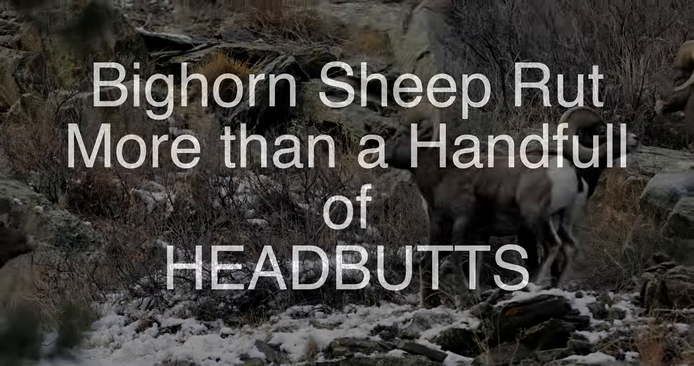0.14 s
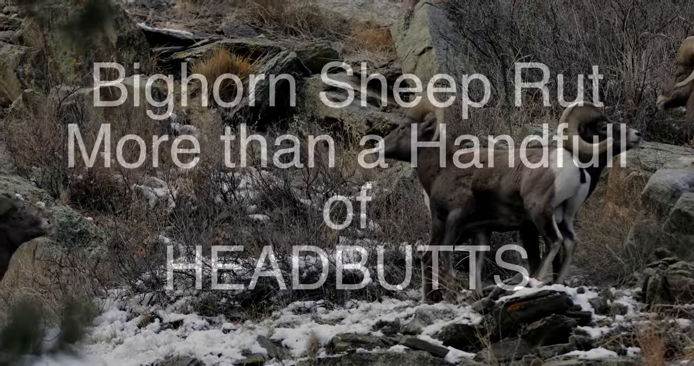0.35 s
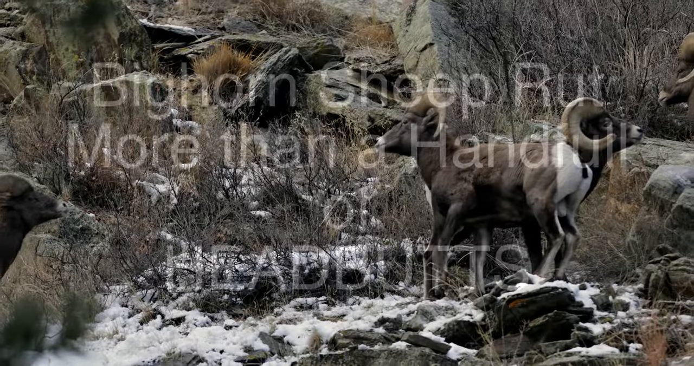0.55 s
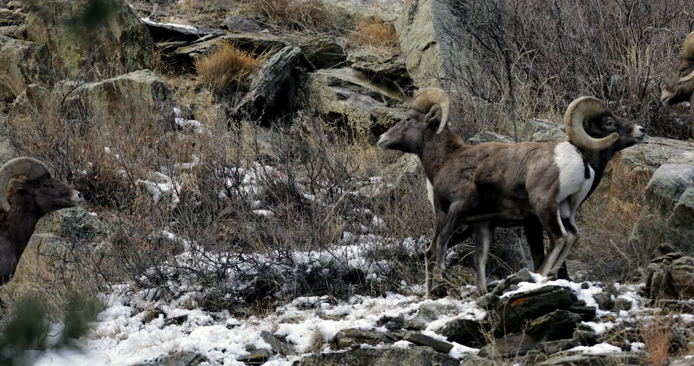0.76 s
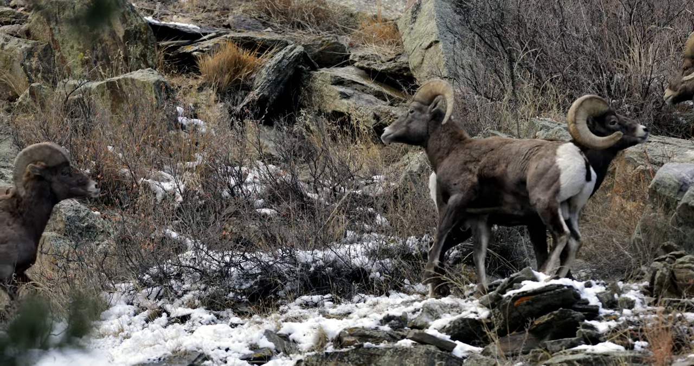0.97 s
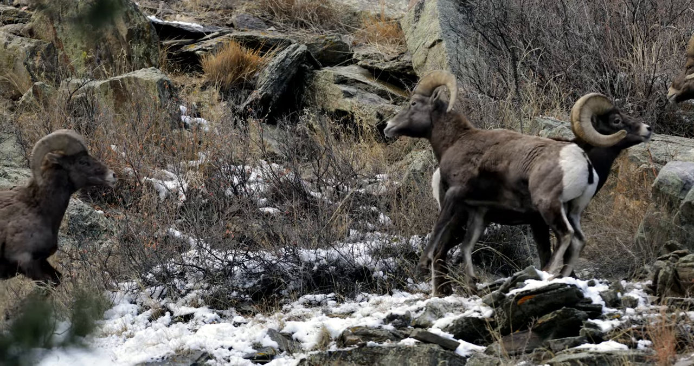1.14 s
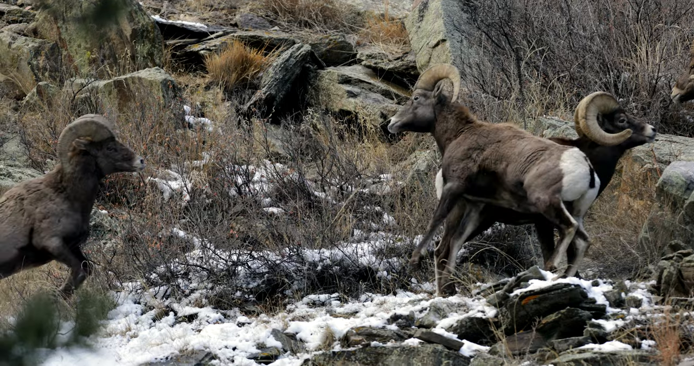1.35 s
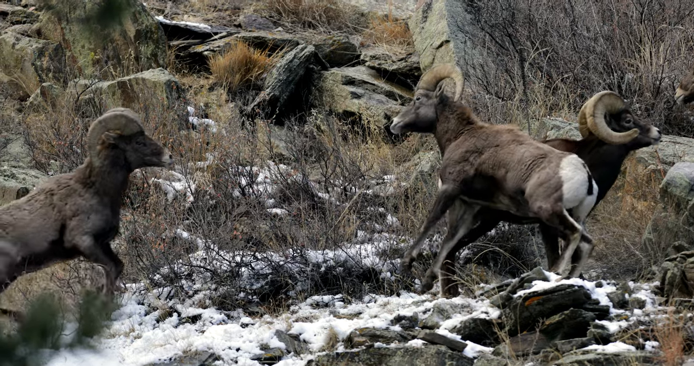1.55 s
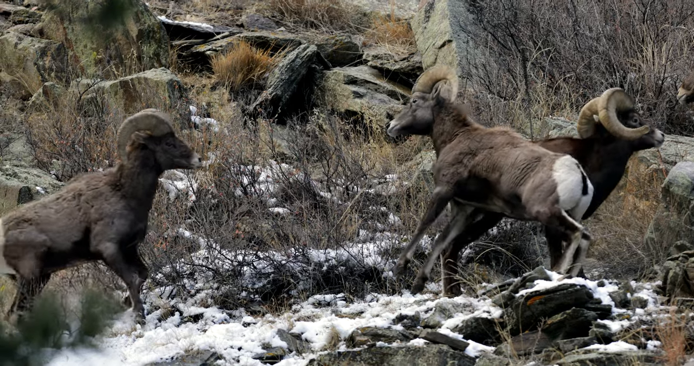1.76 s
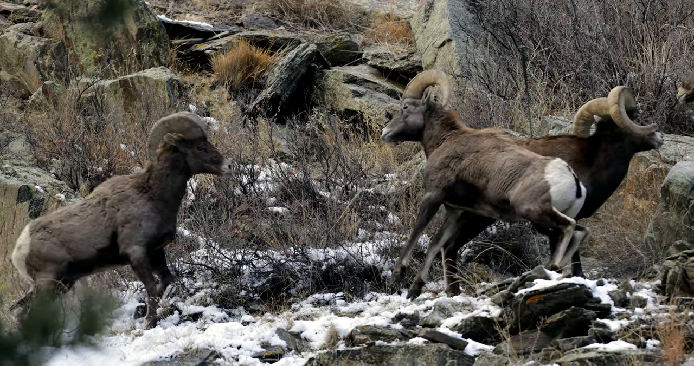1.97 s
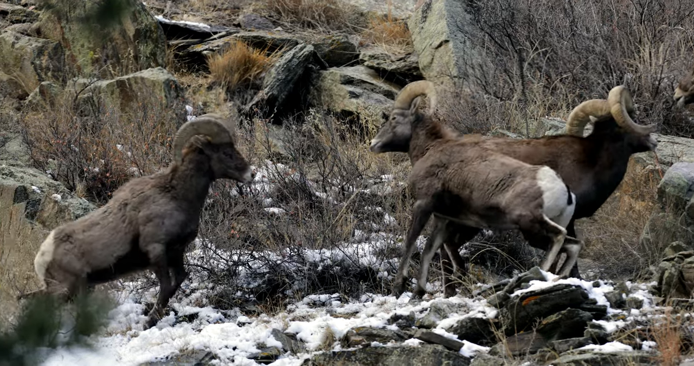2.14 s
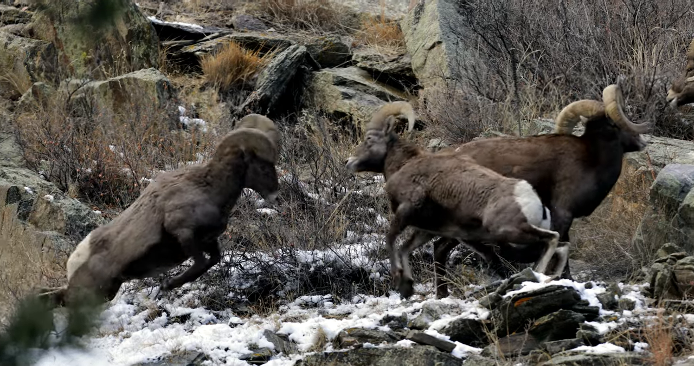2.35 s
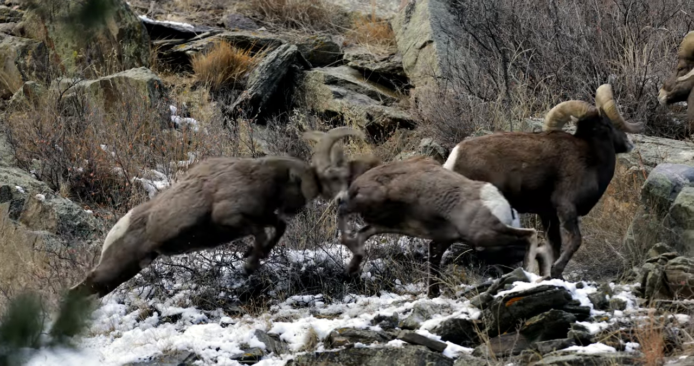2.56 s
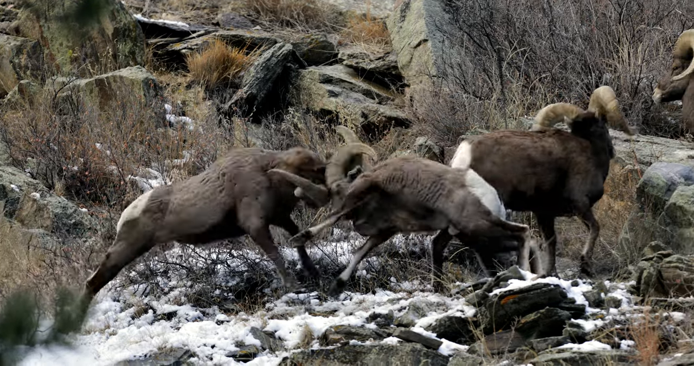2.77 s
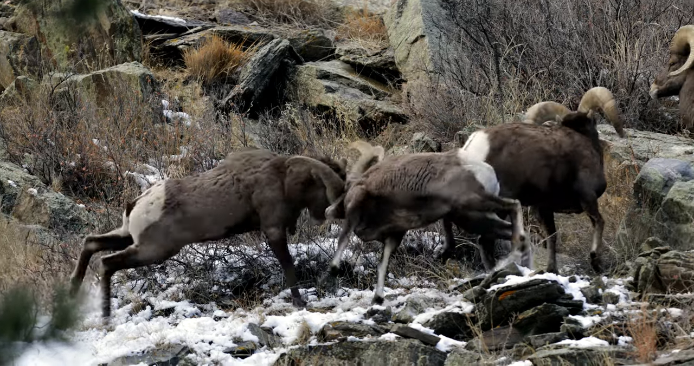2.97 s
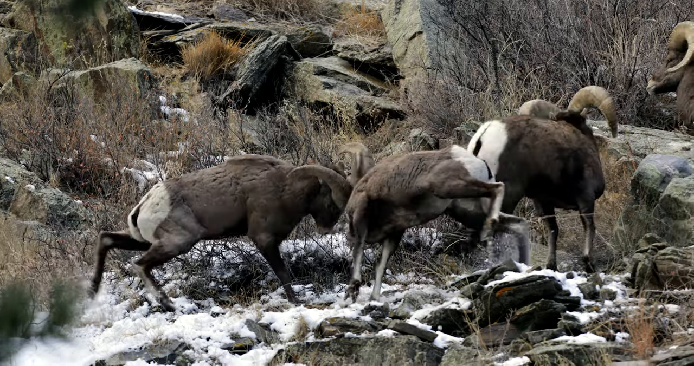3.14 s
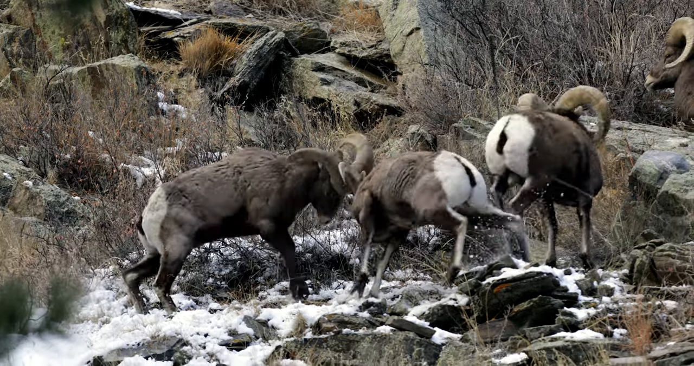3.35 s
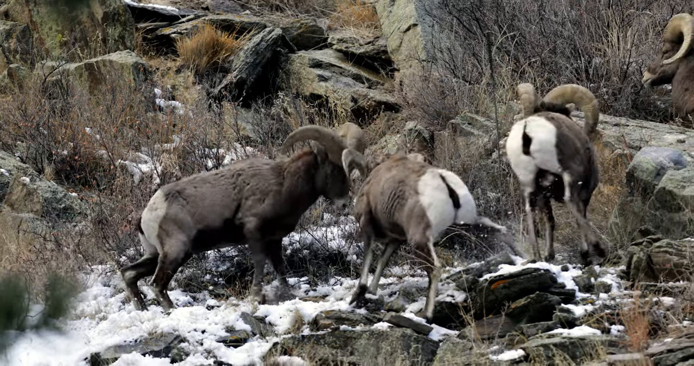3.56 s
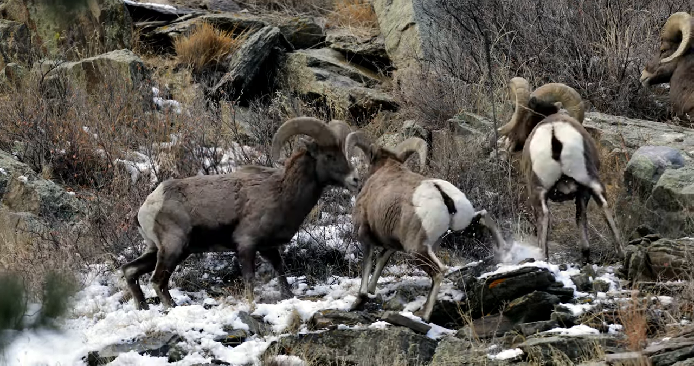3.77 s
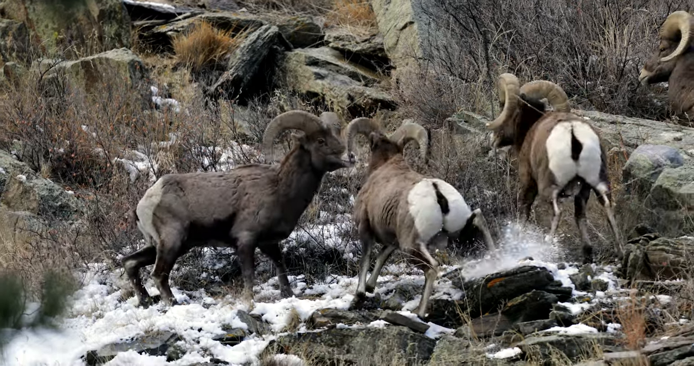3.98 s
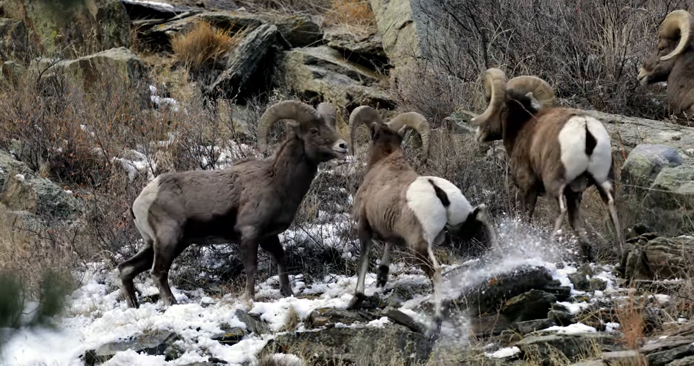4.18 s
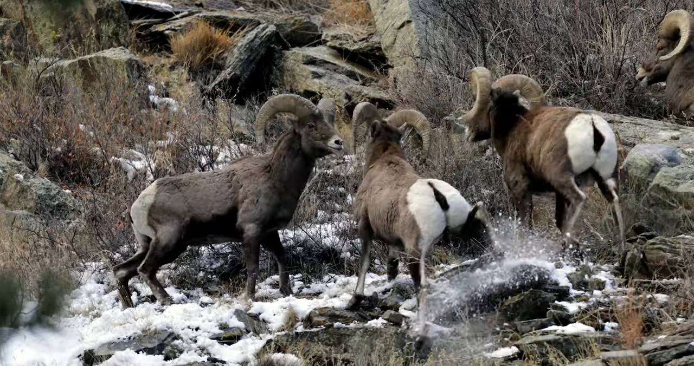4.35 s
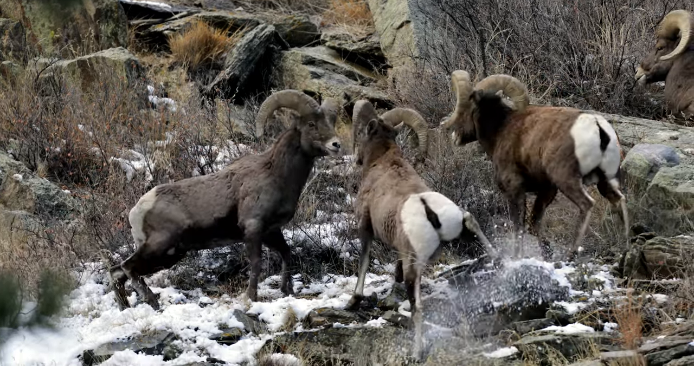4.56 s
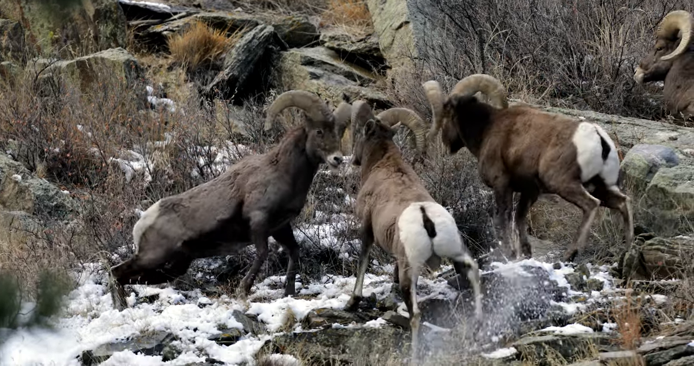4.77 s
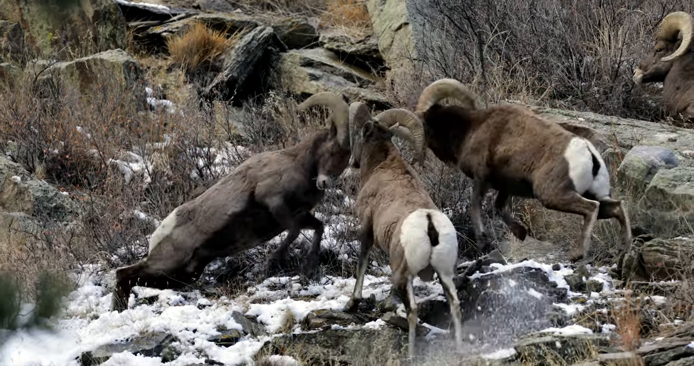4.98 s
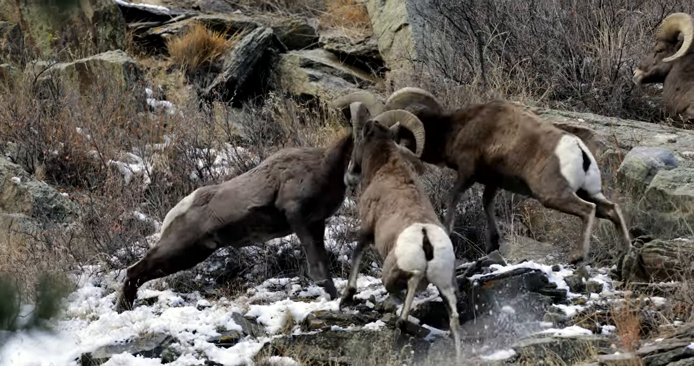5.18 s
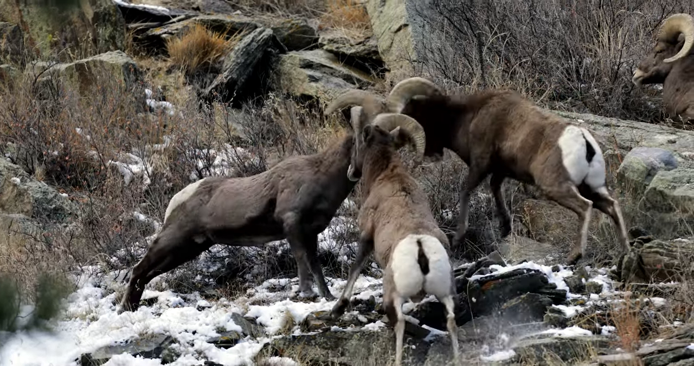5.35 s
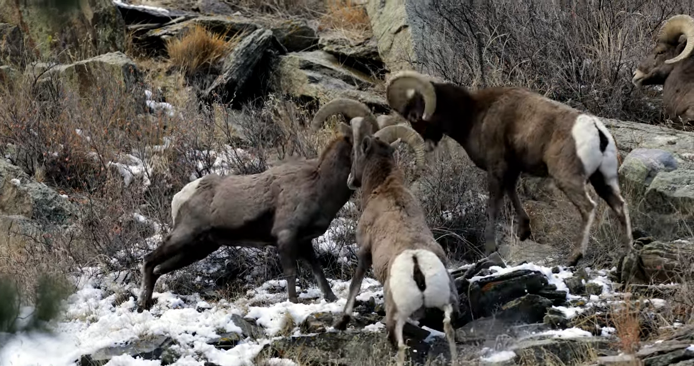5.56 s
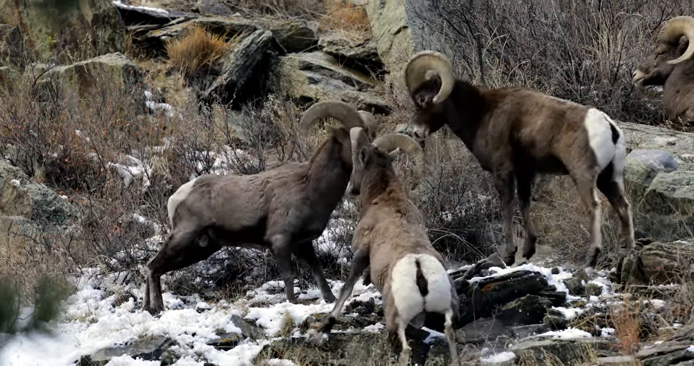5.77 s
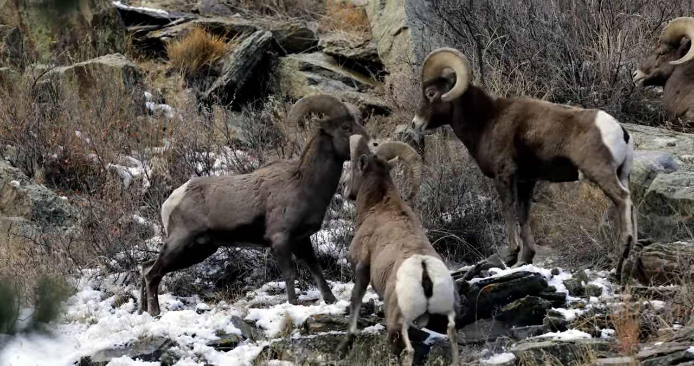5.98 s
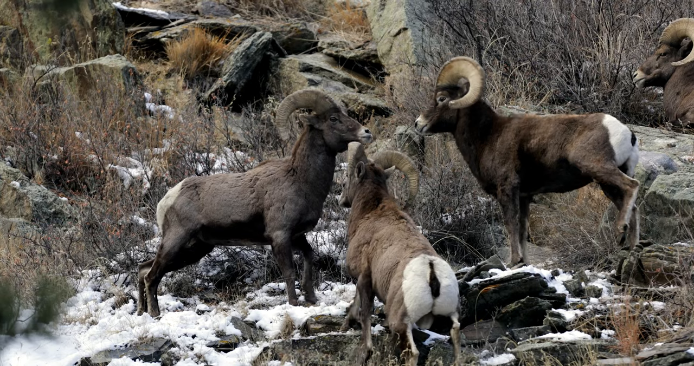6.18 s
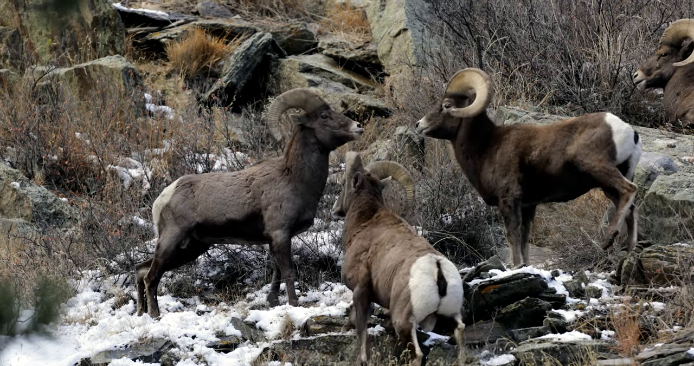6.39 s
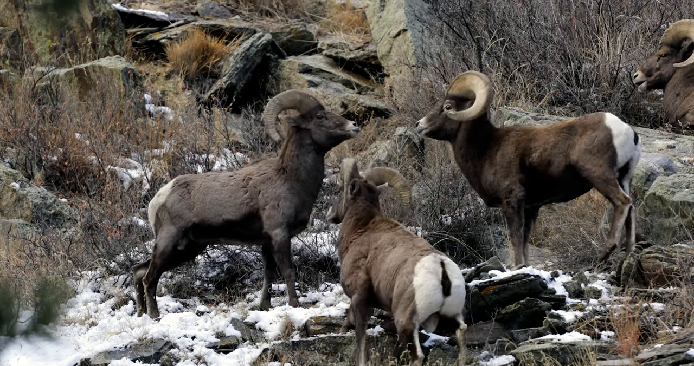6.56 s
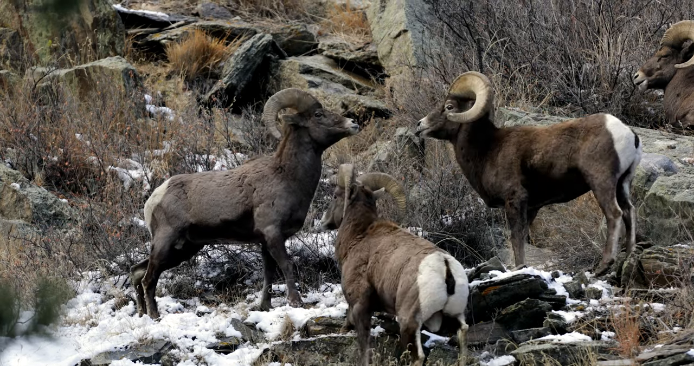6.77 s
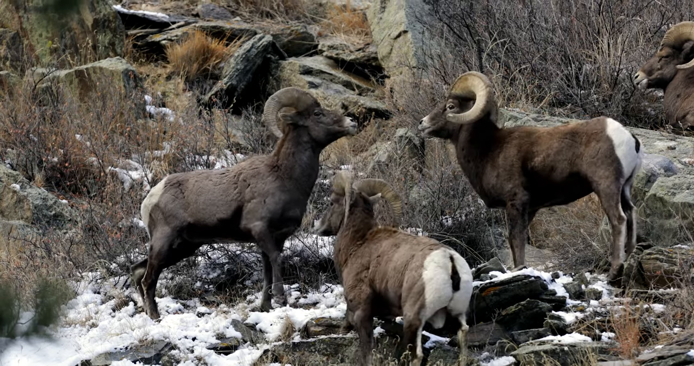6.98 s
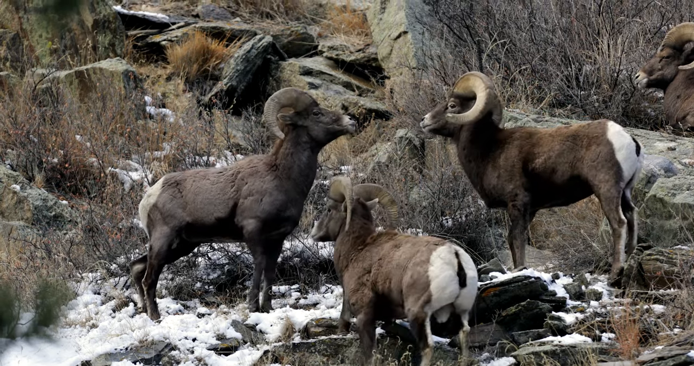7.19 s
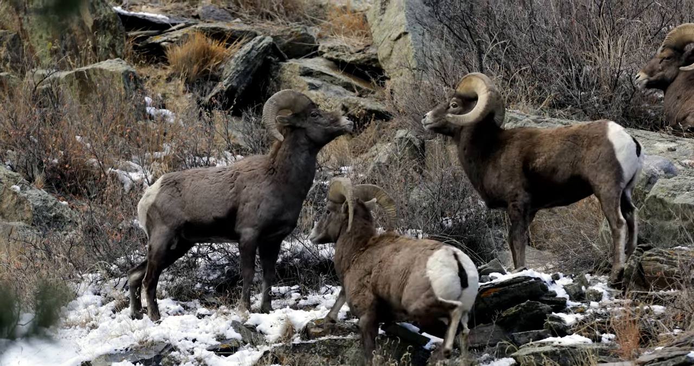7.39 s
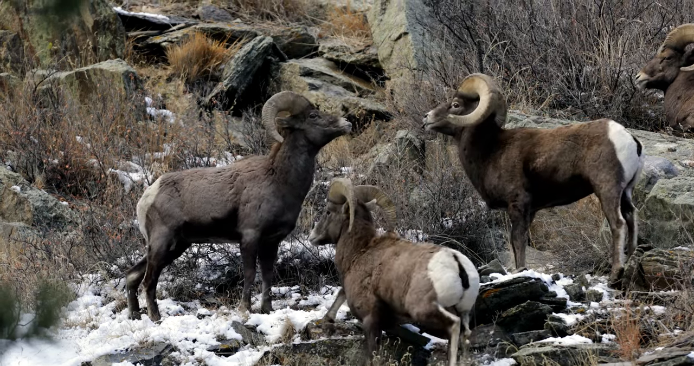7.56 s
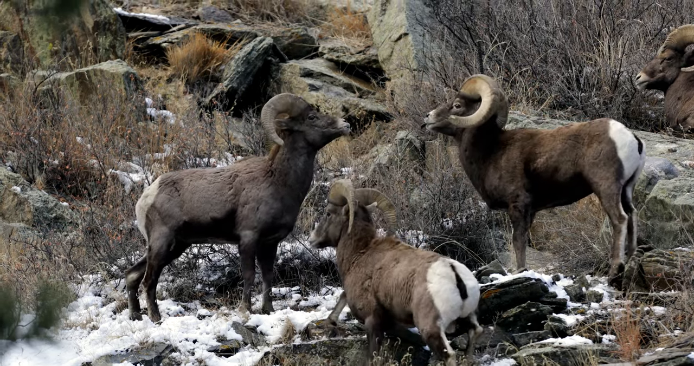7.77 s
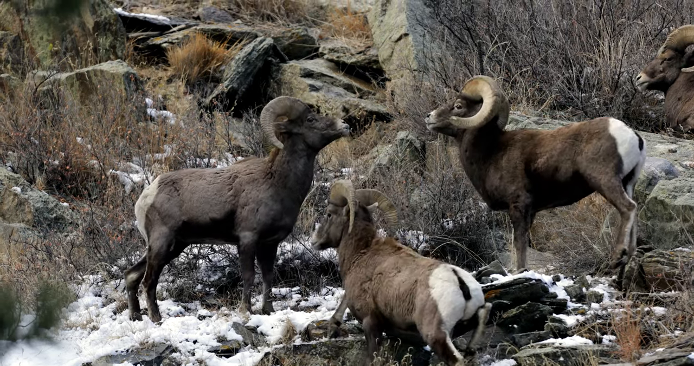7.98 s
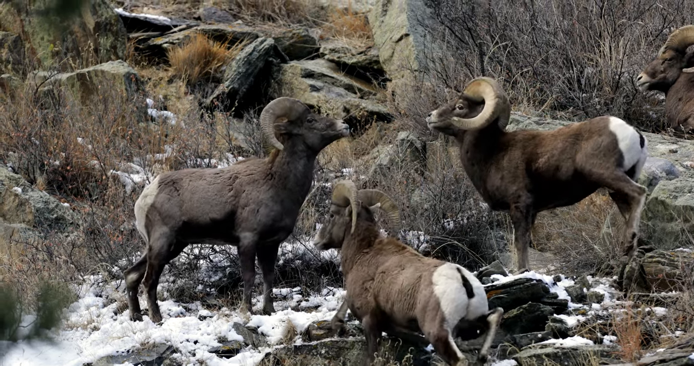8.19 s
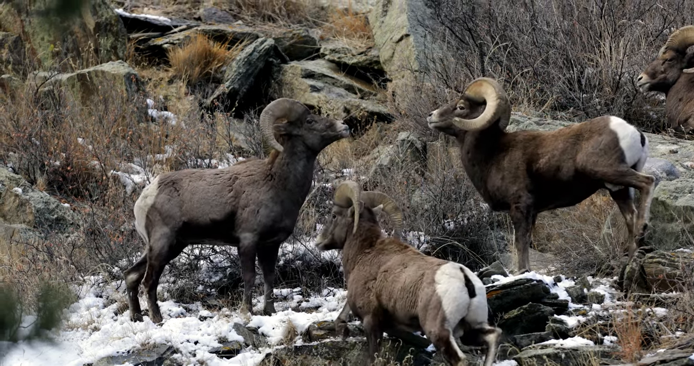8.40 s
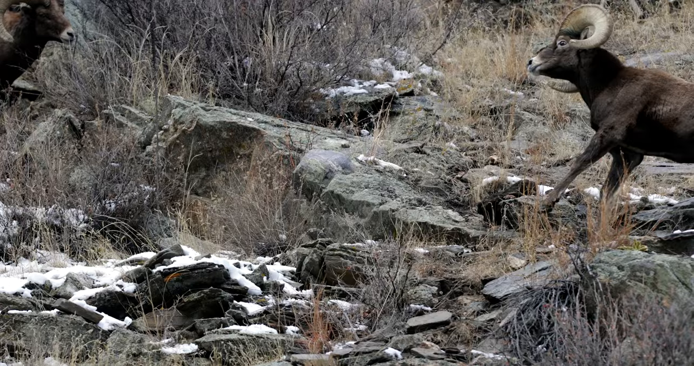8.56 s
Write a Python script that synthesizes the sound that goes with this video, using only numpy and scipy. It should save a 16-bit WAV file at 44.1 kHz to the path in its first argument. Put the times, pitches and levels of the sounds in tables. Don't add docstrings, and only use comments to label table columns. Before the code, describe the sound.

The sound begins almost silent and fades in over about two seconds, revealing a smooth, steady stream rush with fine bubbling, hissing spray and occasional rounded plops. Soft low wind gusts and a faint hum sit beneath it. At about 2.6 s two rams' horns collide: a very loud, sharp crack with a short woody skull knock, a bass thump that overloads, quick bright slaps from nearby rock and a tail dying within about a third of a second. The stream carries on with small splashes and hoof-like ticks and a gust near 3.6 s. A low swell leads into the second clash at about 5.2 s, drier and much heavier, its boom wobbling and distorting, with a slightly later echo off the slope. Another gust follows. Around 6.5 s the low rumble drops away, leaving clear rushing water, plops and ticks until 8.6 s, the rumble returning just at the end.

```python
import sys
import numpy as np
from scipy import signal
from scipy.fft import rfft, irfft, next_fast_len
from scipy.io import wavfile
from scipy.ndimage import uniform_filter1d, map_coordinates

SR = 44100
rng = np.random.default_rng(int(sys.argv[2]) if len(sys.argv) > 2 else 0)


def unload_audio(sound):
    columns = np.transpose(np.atleast_2d(sound))
    steps = np.round(np.clip(columns, -1, 1) * 32767)
    wavfile.write(sys.argv[1], SR, steps.astype(np.int16))


def gain_from_decibels(decibels):
    exponent = np.asarray(decibels, float) / 20
    return 10 ** exponent


N = 380583

# time_s, rush_db
STREAM_LEVEL = [(0, -80.5), (.17, -66.5), (.4, -58), (.53, -56), (.62, -50.5), (.87, -49), (1.38, -50.5),
                (1.7, -47.5), (2.15, -41.5), (2.74, -41), (3.4, -42), (3.85, -41), (5.08, -43.5),
                (5.34, -41.5), (5.8, -41.5), (7.3, -43), (8.63, -42)]
# freq_hz, level_db (per Hz)
RUSH_COLOUR = [(53, -94), (90, -89.5), (151, -27.5), (260, -14.5), (353, -16), (706, -1.5), (821, -1),
               (1090, -5.5), (1570, -5), (3660, -17), (5070, -21), (8530, -25), (13500, -38), (15000, -49),
               (16000, -59.5)]
# freq_hz, level_db (per Hz)
SPRAY_COLOUR = [(2060, -48), (3500, 10), (5090, -14), (8690, 14), (13700, -18), (15100, -30), (16000, -45)]
# freq_hz, side_minus_mid_db
STREAM_WIDTH = [(60, -10), (110, -3), (200, -11.5), (380, -7), (700, -14.5), (1290, -40), (2380, -24),
                (4400, -45), (8120, -11), (15000, -10.5)]
# freq_hz, left_minus_right_db
STREAM_LEAN = [(60, 0.0), (110, 6), (200, -4), (380, -2), (700, -1), (1290, -1.5), (2380, 0.5), (4400, -1),
               (8120, -4), (15000, -1)]
# centre_s, swell_db, half_length_s
WIND_GUSTS = [
    (.37, 5, .1),
    (1.08, 9, .14),
    (1.55, 10, .25),
    (2.3, 5, .06),
    (2.95, 6, .25),
    (3.63, 13, .13),
    (5.46, 12, .14),
    (5.8, 7, .25),
]
# start_s, peak_db, pitch_hz
BIG_BUBBLES = [(0.248, -46.5, 644), (1.719, -43, 690), (1.985, -49, 697), (2.07, -43, 263),
               (2.079, -38, 912.4), (2.294, -28.5, 690), (2.43, -31, 566), (3.419, -32, 860),
               (3.439, -35, 486), (3.858, -31, 1220), (4.317, -27.5, 770), (5.999, -33, 853),
               (6.054, -26, 633), (6.624, -29.5, 630), (7.958, -28, 790), (8.17, -40, 850),
               (8.296, -33, 784)]
# start_s, peak_db, pitch_hz
SPLASH_TICKS = [(1.4726, -33.5, 2536), (1.915, -38, 5560), (2.2594, -33, 2600), (3.1894, -47, 2830),
                (4.2078, -35, 2750), (4.8303, -31, 2670), (5.4195, -42, 3030), (6.2244, -45, 2950),
                (6.35, -33, 2540), (6.4314, -30.5, 3450), (6.7436, -49, 2700), (8.3344, -36, 3860),
                (8.4442, -33, 2900)]
# end_s, strength (full scale x ms)
LEAD_SWELLS = [
    (2.6321, -6.8),
    (5.1859, 18.6),
]
# start_s, blow (full scale x ms), first_recoil (full scale x ms),
# recoil_wait_s, share_kept_each_swing
AIR_PUSHES = [
    (2.64, 22.6, -7.9, .003, .46),
    (5.1964, 180.4, 16.25, .01335, .4),
]
# start_s, peak_db, skull_hz, skull_t60_s, tail_wait_s
HORN_BLOWS = [
    (2.6394, 12, 720, .012, .003),
    (5.1973, 14, 560, .007, .019),
]
# start_s, peak_db, ring_hz, t60_s
ROCK_ECHOES = [
    (2.650, -15, 820, .03),
    (2.6585, -10, 2330, .022),
    (2.667, -16, 2200, .015),
    (5.2155, -19, 800, .02),
]
# freq_hz, level_db (per Hz)
TAIL_COLOURS = [
    [(120, -29), (200, -5), (509, -8.5), (612, -2), (709, -4), (806, 0), (1210, -22), (1370, -29),
     (1480, -8), (2330, -7.5), (3970, -20), (7270, -18), (16000, -31)],
    [(120, -46), (200, -0.5), (448, 0.5), (623, -13), (709, 3), (1140, -18.5), (1350, -8), (3490, -19),
     (3900, -25), (7270, -21), (16000, -33)],
]
# freq_hz, t60_s
TAIL_DECAY = [(200, 0.31), (700, 0.34), (1500, 0.27), (4000, 0.3), (10000, 0.22), (15000, 0.17)]
# tail level_db, stretch of its decay, time it takes to fill in_s
TAIL_LEVEL_DB = [-18, -20]
TAIL_STRETCH = [0.95, 1.16]
TAIL_FILL_S = [0.0022, 0.029]


def unit(x):
    return x / np.sqrt(np.mean(x ** 2) + 1e-20)


def along(points, hz):
    f, v = np.transpose(points)
    return np.interp(np.log(hz + 1), np.log(f + 1), v)


def wobble(rate):
    knots = rng.standard_normal(int(N * rate / SR) + 4)
    return map_coordinates(knots, [np.arange(N) * rate / SR])


def filtered(x, response):
    size = next_fast_len(N + SR)
    hz = np.fft.rfftfreq(size, 1 / SR)
    return irfft(rfft(x, size) * response(hz), size)[..., :N]


def patchy(mid_db, side_db):
    z = signal.stft(rng.standard_normal((2, N)), nperseg=512)[2]
    field = uniform_filter1d(rng.standard_normal(z.shape), size=9, axis=1)
    field = uniform_filter1d(field, size=8, axis=2)
    depth_db = np.reshape([mid_db, side_db], (2, 1, 1))
    return signal.istft(z * gain_from_decibels(depth_db * unit(field)), nperseg=512)[1][:, :N]


def bubbles(s, db, hz, t60, rise, size):
    t = np.arange(size) / SR
    hz, t60 = hz[:, None], t60[:, None]
    shape = gain_from_decibels(db[:, None] - 60 * t / t60) * (1 - np.exp(-t * hz))
    wave = shape * np.sin(2 * np.pi * hz * (t + rise * t * t / (2 * t60)))
    at = np.round(s * SR).astype(int)[:, None] + np.arange(size)
    return np.bincount(at.ravel(), wave.ravel(), N + size)[:N]


def placed(pair, spectrum):
    def colour(hz):
        return gain_from_decibels(along(spectrum, hz) + [0 * hz, along(STREAM_WIDTH, hz)])

    mid, side = filtered(pair, colour)
    both = np.array([mid + side, mid - side]) / np.std(mid)
    return filtered(both, lambda hz: gain_from_decibels(np.outer([.5, -.5], along(STREAM_LEAN, hz))))


def bubble_swarm():
    u = rng.random((4000, 4))
    hz = 250 * 24 ** u[:, 1]
    db = 2.5 * np.log2(hz) - 2.5 * np.log(u[:, 2] + .02)
    return bubbles(u[:, 0] * N / SR, db, hz, (10 + 20 * u[:, 3]) / hz, rise=.3, size=1600)


def droplet_spit():
    v = rng.random((1500, 3))
    hz = 3000 * 4 ** v[:, 1]
    db = -3 * np.log(v[:, 2] + .02)
    return bubbles(v[:, 0] * N / SR, db, hz, 5 / hz, rise=.1, size=120)


def stream():
    time_s, level_db = np.transpose(STREAM_LEVEL)
    rush_db = np.interp(np.arange(N) / SR, time_s, level_db)
    water = patchy(mid_db=.7, side_db=4)
    water[0] = unit(water[0]) + gain_from_decibels(-13) * unit(bubble_swarm())
    water[0] = water[0] + gain_from_decibels(-13) * unit(droplet_spit())
    water[1] = unit(water[1])
    swell_db = .25 * wobble(2.5) + .55 * wobble(14)
    spray_db = rush_db - 33.5 + 2.5 * wobble(3.64) + swell_db + 2.078 * wobble(21)
    spray = gain_from_decibels(spray_db) * placed(patchy(mid_db=-3.5, side_db=14.5), SPRAY_COLOUR)
    return gain_from_decibels(rush_db + swell_db) * placed(water, RUSH_COLOUR) + spray


def rumble():
    t = np.arange(N) / SR
    fade_db = -28 * np.exp(-t / .2)
    gusts_db = sum(db * np.exp(-((t - s) / half) ** 2) for s, db, half in WIND_GUSTS)
    wind_db = -78 + fade_db + gusts_db

    def wind_colour(hz):
        return (hz > 12) / (1 + (hz / 35) ** 2) / (1 + (hz / 110) ** 4)

    wind = unit(filtered(rng.standard_normal(N), wind_colour))
    hum_db = -82.5 + fade_db + 3.3 * wobble(7.9)
    hum_hz = 70 + .75 * t
    hum = np.sqrt(2) * np.sin(2 * np.pi * np.cumsum(hum_hz) / SR + 1.1 * wobble(7))
    lift_on = np.clip((6.51 - t) / 0.017, 0, 1) + np.clip((t - 8.54) / 0.071, 0, 1)
    return lift_on * (gain_from_decibels(wind_db) * wind + gain_from_decibels(hum_db) * hum)


def drops():
    s, db, hz = np.transpose(BIG_BUBBLES)
    plops = bubbles(s, db + 1.5, hz, 26.3 / hz, rise=.2, size=4000)
    s, db, hz = np.transpose(SPLASH_TICKS)
    ticks = bubbles(s, db - 0.5, hz, .008 + 0 * hz, rise=.4, size=1000)
    return filtered(plops + ticks, lambda hz: 1 / (1 + (170 / (hz + 1)) ** 8))


def squashed(x, top, knee):
    return x / (1 + np.abs(x / top) ** knee) ** (1 / knee)


def thump():
    pushes, swell_ends, turn = np.zeros(N), np.zeros(N), np.arange(8)
    swing_s, slows = .011, 1.12
    swings_s = swing_s * (slows ** turn - 1) / (slows - 1)
    for s, blow, recoil, wait, keeps in AIR_PUSHES:
        at = s + np.r_[0, wait + swings_s]
        pushes[np.round(at * SR).astype(int)] = np.r_[blow, recoil * (-keeps) ** turn]
    for end, strength in LEAD_SWELLS:
        swell_ends[round(end * SR)] = strength
    swelling = filtered(swell_ends, lambda hz: 1 / (1 - 1j * hz / 19.2))
    air = (pushes + swelling) * SR / 1000

    def cut_and_lift(hz):
        cut = (1j * hz / (4.22 + 1j * hz)) ** 3 * (1j * hz / (9.48 + 1j * hz)) ** 2
        lift = np.exp(-(hz / 83.4) ** 2.2) * (1 - .69 * np.exp(-(hz / 26) ** 2))
        return cut * lift

    return squashed(filtered(air, cut_and_lift), top=.7, knee=6)


def slope_tail(t, colour, stretch):
    f, at, z = signal.stft(rng.standard_normal(len(t)), SR, nperseg=256)
    decay_db = 60 * at / stretch / along(TAIL_DECAY, f)[:, None]
    z = z * gain_from_decibels(along(colour, f)[:, None] - decay_db)
    tail = signal.istft(z, SR, nperseg=256)[1][:len(t)]
    no_bass = signal.butter(3, 210, "high", fs=SR, output="sos")
    tail = signal.sosfilt(no_bass, tail)
    return tail / np.std(tail[:SR // 20])


def horns():
    out, t = np.zeros(N), np.arange(SR // 2) / SR
    slap_levels_db = [-14.5, -20.5]
    settings = zip(HORN_BLOWS, TAIL_COLOURS, TAIL_LEVEL_DB, TAIL_STRETCH, TAIL_FILL_S, slap_levels_db)
    for (s, db, hz, t60, wait), colour, tail_db, stretch, fill, slap_db in settings:
        knock = -gain_from_decibels(db - 60 * t / t60) * np.sin(2 * np.pi * hz * t)
        grit = signal.lfilter([1], [1, -.7], rng.standard_normal(len(t)))
        crack = gain_from_decibels(-6 - 60 * t / .007) * grit
        arrival = 1 / (1 + np.exp((wait - t) / .001))
        slap = gain_from_decibels(slap_db - 60 * np.abs(t - wait) / .026) * grit * arrival
        tail = gain_from_decibels(tail_db) * slope_tail(t, colour, stretch)
        scatter = gain_from_decibels(0.67 * wobble(134)[:len(t)])
        tail = tail * scatter * arrival * (1 - .5 * np.exp(-t / fill))
        out[round(s * SR):][:len(t)] += knock + crack + slap + tail
    s, db, hz, t60 = np.transpose(ROCK_ECHOES)
    return out + bubbles(s, db, hz, t60, rise=0, size=4000)


def scene():
    return stream() + rumble() + drops() + thump() + horns()


def roll_off(x):
    return signal.sosfilt(signal.butter(12, 16720, fs=SR, output="sos"), x)


def record(dry):
    clipped = squashed(dry, top=.57, knee=16)
    load = uniform_filter1d(np.abs(clipped[0]), size=400)
    ripple = unit(filtered(rng.standard_normal(N), lambda hz: 1 / (1 + (hz / 900) ** 1.46)))
    rough = clipped + gain_from_decibels(-34.5) * load * ripple
    mix = filtered(rough, lambda hz: np.clip((16200 - hz) / 500, 0, 1) ** 2)
    return roll_off(mix)


dry = scene()
out = record(dry)
unload_audio(out)
```